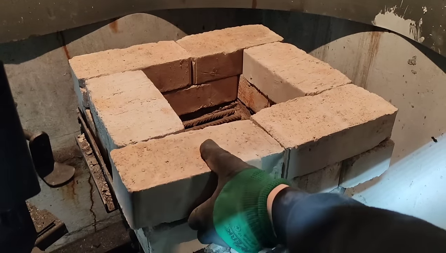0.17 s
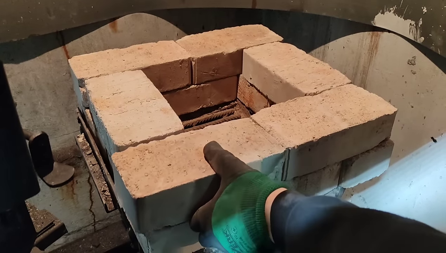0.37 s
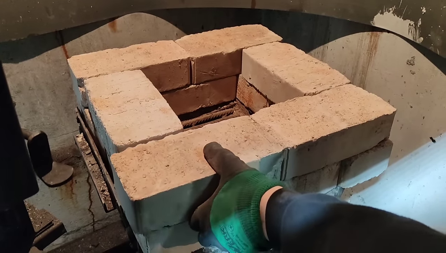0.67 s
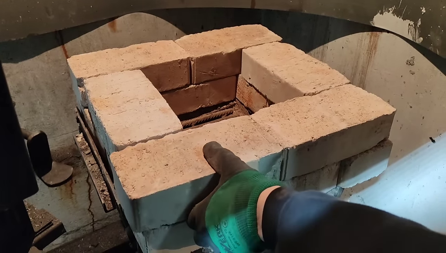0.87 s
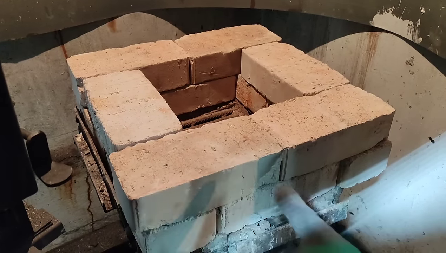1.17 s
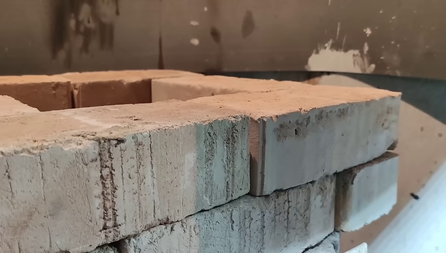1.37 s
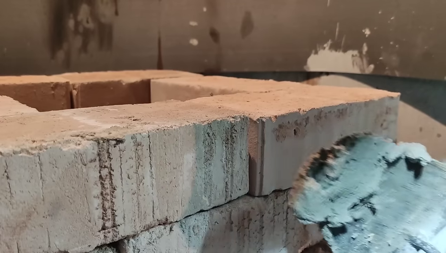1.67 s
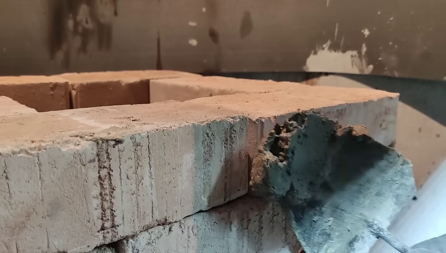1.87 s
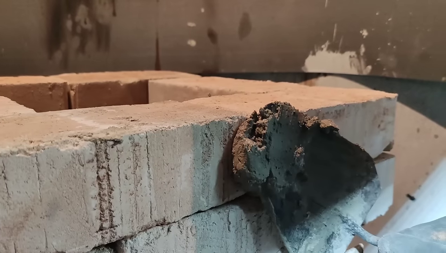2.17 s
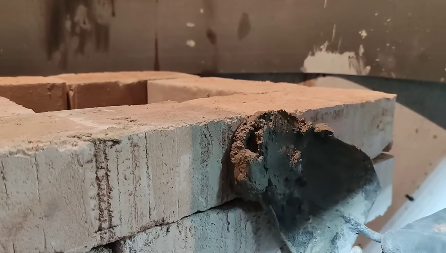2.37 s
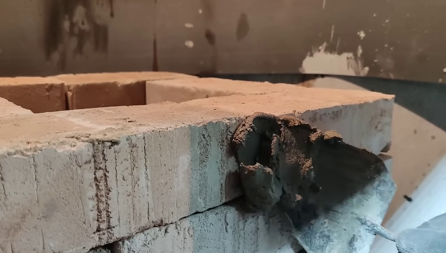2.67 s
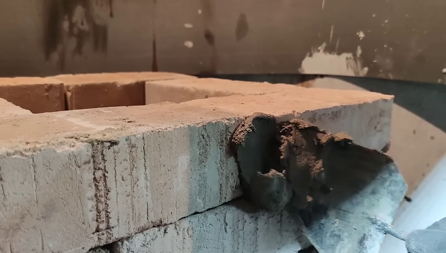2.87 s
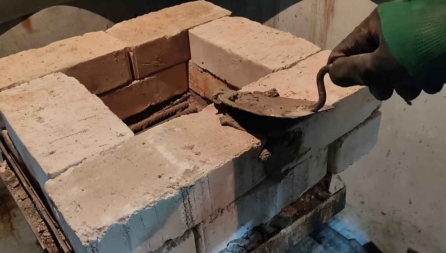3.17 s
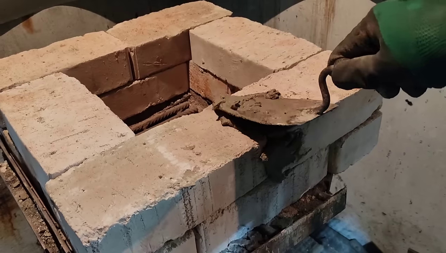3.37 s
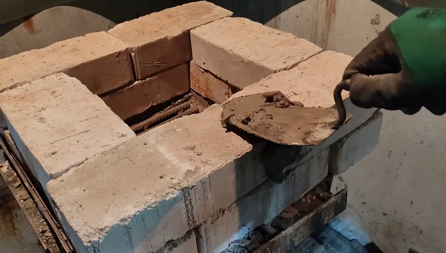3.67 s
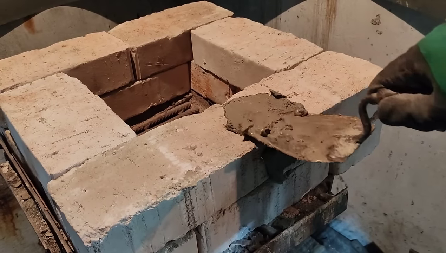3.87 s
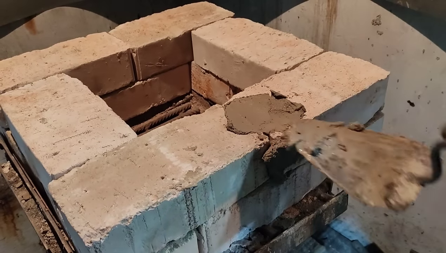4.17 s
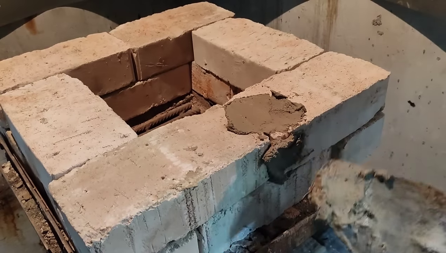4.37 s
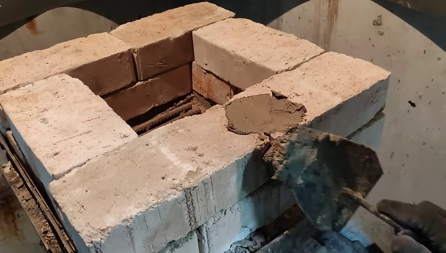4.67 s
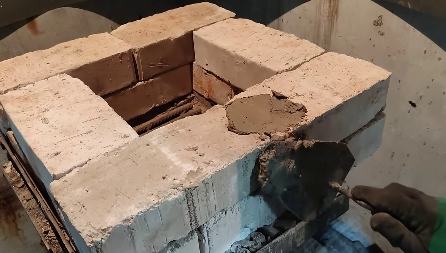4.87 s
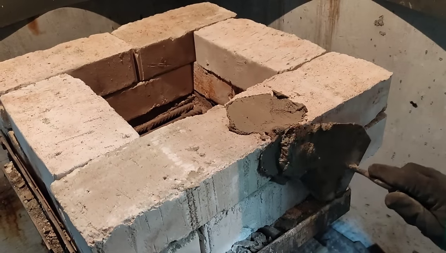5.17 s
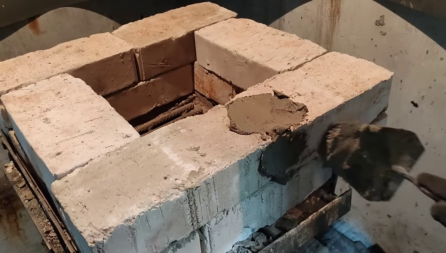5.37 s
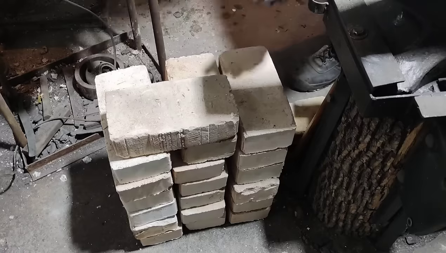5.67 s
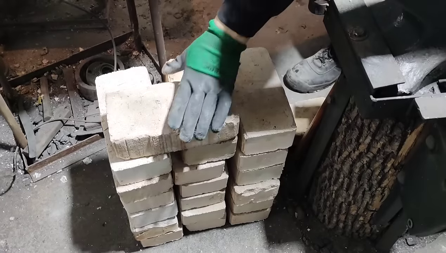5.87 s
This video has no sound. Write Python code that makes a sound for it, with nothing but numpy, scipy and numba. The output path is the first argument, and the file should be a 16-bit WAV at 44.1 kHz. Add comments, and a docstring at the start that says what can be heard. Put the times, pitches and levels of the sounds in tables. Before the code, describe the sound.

A close stereo microphone in a small, quiet workshop with short reflections, low rumble and steady hiss. At 0 seconds two dull knocks sound on brick, then a brick rubs softly to and fro on sand until about 1.2, over a low murmur from the stack. Only room tone remains until 2.2, when a light knock and gritty dabs of a trowel in soft mortar begin. From 2.8 the pressing grows coarser and louder, crackling strongly around 3.1, and breaks off abruptly at 3.25. The blade rings faintly, then wipes with bright, sandy metallic scratches from 3.35 to 4, followed by quick ringing rasps until about 4.3. Dull thuds come at 4.3 and 4.7 in a lull. A firm double knock with a clink at 5.05 starts another run of scraping strokes, strongest near 5.5. From 5.7 a brick is faintly touched and rubbed.

```python
"""A small workshop, bricklaying: a gloved hand rocks a firebrick into its bed, then a steel trowel presses
gritty mortar into a joint, wipes itself on the top face and scrapes the side clean. Sand grains are
random impulses that excite resonances of the blade and the bricks; knocks are sums of decaying partials.
Close walls return the sound as decaying noise, over a low rumble and an even hiss.
The sound breaks off once, at the height of the pressing."""
import sys
import numpy as np
from scipy import signal
from scipy.fft import rfft, irfft
from scipy.io import wavfile
from scipy.ndimage import uniform_filter1d
from numba import njit

SR = 44100
rng = np.random.default_rng(int(sys.argv[2]) if len(sys.argv) > 2 else 0)


def master(y):
    """Save y as 16-bit WAV."""
    cut = np.clip(np.atleast_2d(y).T, -1, 1)
    pcm = np.round(cut * 32767)  # scale
    wavfile.write(sys.argv[1], SR, pcm.astype(np.int16))


N = 265482
T = np.arange(N) / SR  # time in s
RING = np.arange(16384) / SR  # time in s along an impulse response
BREAK_S = 3.245  # where the sound breaks off


# The five strokes of the trowel. Each row: start in seconds, end in seconds.
DAB_S, PRESS_S, WIPE_S, DRAW_S, CLEAN_S = (2.1, 2.78), (2.78, 3.3), (3.3, 4.03), (4.03, 4.9), (4.9, 5.8)
# Blade resonances for each grip and contact point; the dab is in soft mortar.
# Each row: frequency in Hz, bandwidth in Hz, relative level in dB.
DAB_BLADE = [(660, 230, 1), (910, 73, -4.5), (1200, 120, -1), (1580, 44, -20), (2480, 170, 6),
             (4510, 39, 7)]
PRESS_BLADE = [(630, 140, -1.5), (984, 260, 1.5), (1670, 73, 0), (1910, 54, -1), (2340, 120, -1),
               (7570, 370, -6.5)]
WIPE_BLADE = [(975, 22, 9.5), (1710, 67, 10), (2040, 110, -3), (3030, 110, -5), (6500, 240, -7.5),
              (7180, 110, -5.5)]
DRAW_BLADE = [(933, 59, -3), (1247, 36, 11.5), (1785, 58, 12), (3070, 260, -3), (6340, 290, -6),
              (7500, 150, -9)]
CLEAN_BLADE = [(900, 16, 0), (1192, 25, 7), (1353, 32, 5.5), (1700, 55, 5), (2420, 240, -1),
               (5350, 150, -0.5), (6800, 70, -4), (7460, 54, 0)]
# Resonances of the hollow brick stack. Each row: frequency in Hz, bandwidth in Hz, relative level in dB.
STACK_MODES = [(254.3, 7.1, 5), (307.3, 10.4, 12), (528, 14, -0.5), (882, 19, -11)]
# Spectrum of sand under the edge. Each row: frequency in Hz, relative level in dB.
GRIT_SPECTRUM = [(300, -30), (1200, -14), (2300, -5), (3500, -2.5), (5000, -1), (6800, 3), (8000, -1),
                 (9500, -8.5), (11500, -14.5), (15000, -7.5)]
# Spectrum of the blade dragging on brick. Each row: frequency in Hz, relative level in dB.
DRAG_SPECTRUM = [(70, -15), (170, -7), (280, -5), (400, -9), (550, -5), (720, -6), (950, -0.5), (1500, 4.5),
                 (2100, 0), (3200, -19), (8000, -55)]
# Pushes of the trowel. Each row: start in seconds, attack in seconds, hold in seconds,
# relative grit level in dB, low scrape relative to the grit in dB.
PUSHES = [ (2.196, 0.025, 0.0091, -46, -4.5), (2.237, .01, 0.034, -67.5, 8),
          (2.336, 0.031, 0.089, -59.5, 0.5), (2.475, 0.0055, 0.019, -58.5, 4.5),
          (2.484, 0.052, 0.17, -52, -3.5), (2.709, 0.019, 0.059, -53.5, -4.5),
          (2.798, 0.0041, 0.11, -45.5, -7.5), (2.946, .045, 0.025, -49, -7.5),
          (3.029, 0.0043, 0.037, -39.5, -10.5), (3.087, 0.062, 0.11, -31.5, -12),
          (3.164, 0.04, .045, -35.5, 0.5), (3.340, 0.0034, 0.077, -47, -14),
          (3.407, 0.0034, .014, -33.5, -13), (3.443, 0.0037, 0.021, -39.5, -15.5),
          (3.514, 0.011, 0.03, -45, -14.5), (3.575, 0.0096, 0.078, -45, -12.5),
          (3.673, .025, 0.086, -45, -13.5), (3.838, 0.0015, 0.022, -39.5, -15),
          (3.906, 0.097, 0.032, -53.5, -12.5), (4.04, .004, .028, -38.5, -13.5),
          (4.098, 0.0018, 0.0083, -33, -16.5), (4.139, 0.027, 0.034, -36.5, -14),
          (4.186, 0.03, 0.03, -32.5, -12.5), (4.308, .03, 0.18, -63, -10), (4.985, 0.0037, 0.023, -63, -13),
          (5.035, 0.0026, 0.012, -49.5, -6), (5.077, 0.019, .02, -44, -9.5),
          (5.113, 0.0047, .022, -34.5, -8.5), (5.150, 0.011, 0.024, -40, -6.5),
          (5.199, 0.0034, 0.062, -39, -8), (5.216, 0.041, 0.044, -34, -7.5),
          (5.305, 0.021, .1, -42.5, -7.5), (5.428, 0.021, 0.067, -39, -11), (5.506, 0.013, 0.052, -28, -11),
          (5.627, 0.014, 0.045, -66.5, 4.5), ]


def trowel(stroke_s, modes, top_db, spread_db, judder_db, wander):
    """Friction-excited resonance: grains hiss at the edge; a harder drag shakes blade and stack more."""
    first, last = stroke_s
    pushes = [push for push in PUSHES if first <= push[0] < last]
    span = (T >= pushes[0][0]) & (T < last + 0.15)
    t = T[span]
    grit = effort(push[:4] for push in pushes)[span]
    scrapes = [(start, attack, hold, db + drag_db) for start, attack, hold, db, drag_db in pushes]
    drag = effort(scrapes)[span] / grit  # gain of the scrape relative to the grit

    sand = grains(len(t), rate=7000, spread_db=spread_db, judder_db=judder_db, judder_rate=300)
    excitation = sand * grit + catches(t) * (t < last)
    blade = resonate(excitation, modes, wander)
    # top_db dulls or brightens the finest crackle of each stroke
    crackle_tone = colour([(5000, 0.0091), (14000, top_db)])
    edge = convolve(blade, convolve(unit(colour(GRIT_SPECTRUM)), crackle_tone))
    body = convolve(blade * drag, unit(colour(DRAG_SPECTRUM)))
    out = np.zeros(N)
    out[span] = edge + resonate(body, STACK_MODES, wander=0)
    return out


# The edge catches on coarse grains. Each row: time in seconds, relative peak level in dB.
CATCHES = [(2.1986, -37), (2.2174, -36), (2.5386, -36), (2.6188, -34.5), (2.803, -33), (3.042, -23),
           (3.147, -16.5), (3.344, -30.5), (3.4105, -16), (3.8536, -23), (4.0989, -16.5), (4.104, -23),
           (4.203, -23), (4.2166, -22), (5.1144, -25), (5.2029, -22), (5.24, -21), (5.525, -15)]


def catches(t, snap_db=2.0, crumbs_db=-15.0, crumbs_s=0.0047):
    """Brittle fracture: a coarse grain snaps and its crumbs are crushed in a decaying burst just after."""
    snaps = np.zeros(len(t))
    for start, db in CATCHES:
        if t[0] <= start <= t[-1]:
            snaps[np.searchsorted(t, start)] += undb(db)
    decay = convolve(snaps, np.exp(-RING / crumbs_s))
    crumbs = decay * grains(len(t), rate=4600, spread_db=0.5, judder_db=5, judder_rate=340)
    return undb(snap_db) * 2 * snaps + undb(crumbs_db) * crumbs


# Ringing of the loose blade. Each row: frequency in Hz, bandwidth in Hz, relative level in dB.
SING_MODES = [(1670, 15, 3), (1914, 47, 1), (2017, 44, 0), (6640, 1800, -10)]
# The lifted blade sings as it is turned over and brought down again.
# Each row: start in seconds, attack in seconds, hold in seconds, relative level in dB.
SINGS = [(3.247, 0.0034, .025, -53), (3.29, 0.011, 0.039, -63), (3.338, 0.0096, 0.14, -49)]


def singing_blade():
    """Sustained modal excitation: loose grit, as noise, keeps a blurred ring going in the steel."""
    loose_grit = rng.standard_normal(N) * effort(SINGS)
    return convolve(loose_grit, unit(ring(SING_MODES)))


# Dull knocks on the brickwork. Each row: time in seconds, thud level in dB, clink level in dB.
KNOCKS = [(0.02, -31, -42), (.06, -30, -55), (2.198, -41, -40), (2.218, -35, -40), (4.331, -27.5, -58),
          (4.702, -35.5, -56), (5.039, -18, -21), (5.052, -14, -23), (5.815, -54, -38)]
# Partials of the thud. Each row: frequency in Hz, bandwidth in Hz, relative level in dB.
THUD_MODES = [(146, 23, -49), (256.4, 9.9, 3), (298, 6.2, -0.5), (413, 42, -18.5), (548, 16, -14.5)]
# Partials of the clink. Each row: frequency in Hz, bandwidth in Hz, relative level in dB.
CLINK_MODES = [(1240, 15, 6), (1325, 22, 6), (1840, 31, -29), (2320, 94, -6), (3820, 130, -31),
               (5250, 1600, -16)]


def knocks():
    """Impulse response of struck bodies: the stack thuds and the struck piece clinks."""
    blows = np.zeros((2, N))
    for start, thud_db, clink_db in KNOCKS:
        blows[:, int(start * SR)] = undb([thud_db, clink_db])
    thuds = convolve(blows[0], unit(ring(THUD_MODES)))
    clinks = convolve(blows[1], unit(ring(CLINK_MODES)))
    return thuds + clinks


# A brick is rocked to and fro on its sandy bed; later the glove takes hold of the next one.
# Each row: start in seconds, attack in seconds, hold in seconds, relative level in dB.
RUBS = [(.155, 0.013, 0.088, -65.5), (.29, 0.068, 0.043, -57.5), (.51, 0.025, .09, -66),
        (.70, 0.049, 0.037, -63), (.903, 0.0068, 0.045, -64), (1.045, 0.048, 0.05, -65),
        (5.722, 0.0068, 0.013, -63.5), (5.810, 0.0037, 0.0057, -56), (5.84, 0.022, 0.072, -68.5)]
# Spectrum of brick on fine sand. Each row: frequency in Hz, relative level in dB.
BED_SPECTRUM = [(300, -16), (750, -6), (1100, 2), (1500, 0), (2400, 2), (3500, -4.5), (5500, -1.5),
                (7500, 2.5), (10000, -18), (15000, -12)]
# Spectrum of the murmuring stack. Each row: frequency in Hz, relative level in dB.
LEAN_SPECTRUM = [(40, 11.5), (100, -5), (200, 0.5), (310, -5.5), (420, -38), (1000, -16), (4000, -60)]
# The murmur weakens under the leaning hand until it lets go.
LEAN_DB, LEAN_S, LEAN_SAG_DB_PER_S = -58, 1.22, 5


def bedding():
    """Granular friction: a brick rubs softly over fine sand; the stack murmurs while the hand leans on it."""
    rub = grains(N, rate=5400, spread_db=2.0, judder_db=2.5, judder_rate=130) * effort(RUBS)
    unsteady = rng.standard_normal(N) * undb(2 * walk(25.4, N))
    lean = unsteady * swell(0, 0, LEAN_S, LEAN_DB, LEAN_SAG_DB_PER_S)
    return convolve(rub, unit(colour(BED_SPECTRUM))) + convolve(lean, unit(colour(LEAN_SPECTRUM)))


def workshop(x, near_db=-1, near_t60=0.061, far_db=-11, far_t60=0.2, far_top_hz=7500):
    """Reverberation: direct sound and scatter from brick faces vary by spot; the room's duller tail stays."""
    decay = np.exp(-np.log(1000) * RING / far_t60)  # down 60 dB after far_t60 seconds
    far = two_ears(len(RING), split_hz=230) * decay * np.minimum(RING / 0.0059, 1)
    far = signal.lfilter(*signal.butter(2, far_top_hz, fs=SR), far)
    out = undb(far_db) * np.array([convolve(x, unit(tail)) for tail in far])
    early = RING[:4096]
    for weight in contact_spots(len(x)):
        near = two_ears(len(early), split_hz=630) * np.exp(-np.log(1000) * early / near_t60)
        near = signal.lfilter(*signal.butter(1, 350, "high", fs=SR), near)  # long waves pass round the bricks
        for ear, lag in enumerate(rng.integers(0, 13, 2)):  # arrival delay in samples
            response = undb(near_db) * unit(near[ear])
            response[lag] += 1  # direct sound
            out[ear] += convolve(x * weight, response)
    return out


def contact_spots(size, count=6, spots_per_s=16):
    """Cross-fading: weights hand the sound on from one spot along the brick to the next, in a cycle."""
    position = T[:size] * spots_per_s - np.arange(count)[:, None]
    offset = (position + count / 2) % count - count / 2
    return np.cos(np.pi / 2 * np.clip(offset, -1, 1))


# Spectrum of the quiet room. Each row: frequency in Hz, relative level in dB.
AIR_SPECTRUM = [(12, -16), (20, -4.5), (46, -5.5), (62, -12), (119, -22), (148, -19.5), (266, -26.5),
                (324, -29.5), (372, -27), (452, -29.5), (505, -30), (1130, -35.5), (3170, -36), (3640, -38),
                (6360, -37), (15500, -44)]
AIR_DB = -61


def air(waver_db=1, low_cut_hz=37):
    """Diffuse ambient noise: a wavering low rumble and the even hiss of the quiet room."""
    noise = np.array([convolve(ear, colour(AIR_SPECTRUM)) for ear in two_ears(N, split_hz=52)])
    noise = signal.lfilter(*signal.butter(4, low_cut_hz, "high", fs=SR), noise)
    rumble = signal.lfilter(*signal.butter(2, 150, fs=SR), noise)
    noise = noise + rumble * (undb(waver_db * walk(7, N)) - 1)
    return noise / noise.std() * undb(AIR_DB)


def grains(size, rate, spread_db, judder_db, judder_rate):
    """Shot noise: grains snap at random (rate per s), bunched by stick and slip; rms 1."""
    strength = undb(spread_db * np.minimum(rng.exponential(size=size), 4))
    snaps = rng.random(size) < rate / SR
    sign = rng.choice([-1, 1], size)
    stick_slip = undb(judder_db * walk(judder_rate, size))
    x = snaps * strength * sign * stick_slip
    return x / x.std()


# Every push of the hand swells, eases off slowly while it is held, and dies away.
SWELL_DB, SAG_DB_PER_S, RELEASE_DB_PER_S = 10.5, 21, 388


def swell(start, attack, hold, db, sag=SAG_DB_PER_S):
    """Piecewise-exponential envelope: the gain of a push swells, sags while held and is released."""
    t = T - start
    attack = max(attack, 1 / SR)
    rise = SWELL_DB * np.minimum(t / attack - 1, 0)
    held = sag * np.clip(t - attack, 0, hold)
    release = RELEASE_DB_PER_S * np.maximum(t - attack - hold, 0)
    level_db = np.maximum(db + rise - held - release, -200)
    return undb(level_db) * (t >= 0)


def effort(pushes):
    """Power addition: joint gain of (start, attack, hold, dB) pushes, summed in power where they overlap."""
    return np.sqrt(sum(swell(*push) ** 2 for push in pushes))


def ring(modes):
    """Modal synthesis: a sum of partials, each decaying at the rate its bandwidth sets."""
    partials = [undb(db) * width * np.exp(-np.pi * width * RING) * np.sin(2 * np.pi * hz * RING)
                for hz, width, db in modes]  # the factor width makes db the height of the spectral peak
    return sum(partials)


def resonate(x, modes, wander):
    """Parallel resonance: modes add to the sound and drift together as the contact point moves."""
    drift = np.exp(wander * walk(8.8, len(x)))
    return x + sum(undb(db) * band(x, hz * drift, float(width)) for hz, width, db in modes)


@njit
def band(x, hz, width):
    """State-variable resonator: a band-pass with a moving centre and gain 1 there."""
    y, b, low = np.empty(len(x)), 0., 0.
    for i in range(len(x)):
        g, k = np.tan(np.pi * hz[i] / SR), width / hz[i]
        v = (b + g * (x[i] + 1e-18 - low)) / (1 + g * (g + k))
        b, low, y[i] = 2 * v - b, low + 2 * g * v, k * v
    return y


def colour(points, size=4096):
    """Minimum phase: the causal impulse response with the given (Hz, dB) spectrum, by folding its cepstrum."""
    hz, db = np.transpose(points)
    bins = np.maximum(np.arange(size // 2 + 1) * SR / size, 1)
    gain = undb(np.interp(np.log(bins), np.log(hz), db))
    cepstrum = irfft(np.log(gain))
    cepstrum[1:size // 2] *= 2
    cepstrum[size // 2 + 1:] = 0
    return irfft(np.exp(rfft(cepstrum)))


def two_ears(size, split_hz):
    """Diffuse-field coherence: noise alike left and right in the bass, unrelated above."""
    mid, side = rng.standard_normal((2, size))
    side = signal.lfilter(*signal.butter(1, split_hz, "high", fs=SR), side)
    return np.array([mid + side, mid - side]) / np.sqrt(2)


def walk(rate, size):
    """Smoothed random steps: slow chance variation, rate steps per second, with a spread near 1."""
    hold = max(int(SR / rate), 1)
    steps = np.repeat(rng.standard_normal(size // hold + 1), hold)[:size]
    return uniform_filter1d(steps, hold) * np.sqrt(3 / 2)


def convolve(x, response):
    """Linear superposition: pass a sound through an impulse response, keeping its length."""
    return signal.oaconvolve(x, response)[:len(x)]


def unit(response):
    """Energy normalisation: scale a response to unit energy."""
    return response / np.sqrt(np.sum(response ** 2))


def undb(db):
    """Logarithmic level: decibels to amplitude gain."""
    return np.exp(np.asarray(db) * np.log(10) / 20)


# Spectra of the left and right microphone ports. Each row: frequency in Hz, relative level in dB.
LEFT_PORT = [(1200, -1.5), (2200, 1), (3100, -1.5), (4500, 0), (6000, -7.5), (7000, 1), (8000, 3),
             (9500, 1), (12000, -1.5), (15000, -13)]
RIGHT_PORT = [(1200, -2.5), (2200, 1), (3100, 6), (4500, 2), (6400, 3), (7300, -3), (8200, -10.5),
              (9500, -2.5), (12000, 2), (15000, -1.5)]


def scene():
    """Superposition of sources: five trowel strokes between soft brick handling, in a room with air noise."""
    dab = trowel(DAB_S, DAB_BLADE, top_db=-1, spread_db=5.5, judder_db=2.0, wander=0.03)
    press = trowel(PRESS_S, PRESS_BLADE, top_db=0.0, spread_db=5.0, judder_db=1.0, wander=0.0063)
    press = press * (T < BREAK_S)
    wipe = trowel(WIPE_S, WIPE_BLADE, top_db=3.0, spread_db=5.0, judder_db=2, wander=0.0069)
    draw = trowel(DRAW_S, DRAW_BLADE, top_db=-0.5, spread_db=4.5, judder_db=1.0, wander=0.0086)
    clean = trowel(CLEAN_S, CLEAN_BLADE, top_db=1.5, spread_db=3.0, judder_db=0.26, wander=0.0068)
    sources = bedding() + dab + press + wipe + draw + clean + singing_blade() + knocks()

    # the echoes break off too: each side of the break has its own reverberation
    parts = np.split(sources, [int(BREAK_S * SR)])
    work = np.hstack([workshop(part) for part in parts])
    ears = [convolve(ear, colour(port)) for ear, port in zip(work, (LEFT_PORT, RIGHT_PORT))]
    return np.array(ears) + air()


def record(dry):
    """Band limiting: the recorder's steep elliptic low-pass cuts the top."""
    top_hz = 15700
    low_pass = signal.ellip(10, 0.2, 80, top_hz, fs=SR, output="sos")
    return signal.sosfilt(low_pass, dry)


dry = scene()
out = record(dry)
master(out)
```